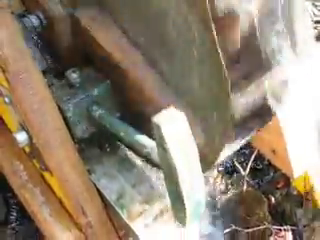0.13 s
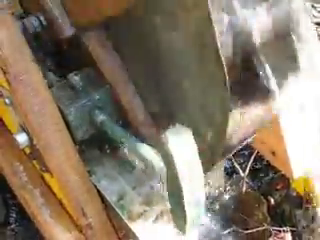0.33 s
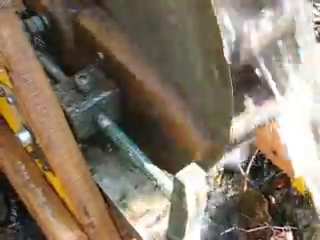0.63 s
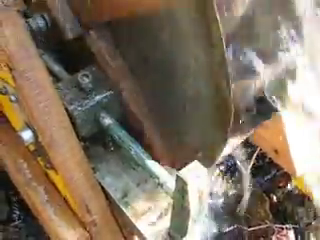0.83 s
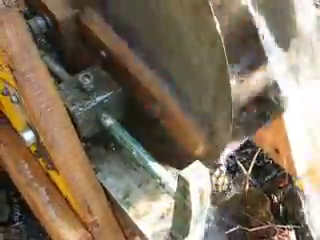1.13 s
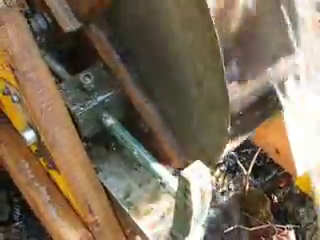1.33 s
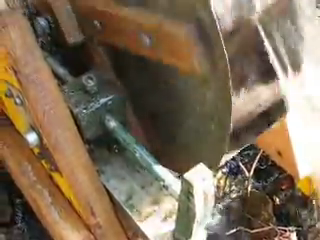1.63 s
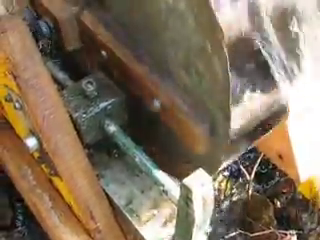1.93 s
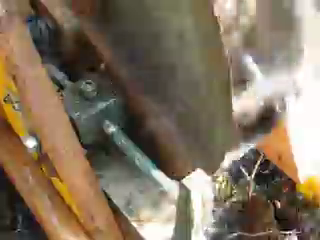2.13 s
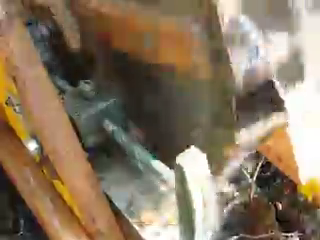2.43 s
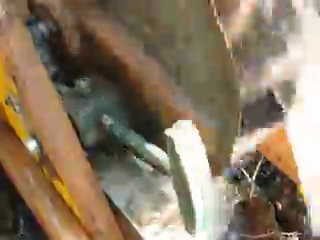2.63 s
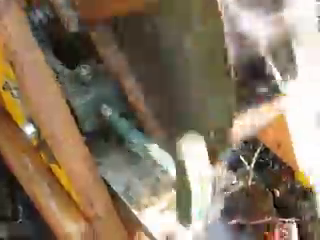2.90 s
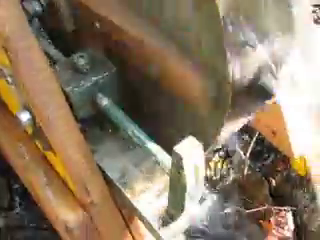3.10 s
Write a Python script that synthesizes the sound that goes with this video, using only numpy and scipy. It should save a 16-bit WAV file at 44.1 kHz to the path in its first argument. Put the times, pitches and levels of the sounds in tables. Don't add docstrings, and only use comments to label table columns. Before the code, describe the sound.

Water rushes and bubbles over a turning mill wheel while a trip hammer bangs sharply.

```python
import sys
import numpy as np
from scipy import signal
from scipy.io import wavfile

SR = 44100
rng = np.random.default_rng(int(sys.argv[2]) if len(sys.argv) > 2 else 0)


def magnitude_from_level(level_db):
    exponent = np.asarray(level_db, float) / 20
    return 10 ** exponent


def int16_out(signal):
    q = np.round(np.clip(np.atleast_2d(signal).T, -1, 1) * 32767)
    wavfile.write(sys.argv[1], SR, q.astype(np.int16))


N = 143766
TIME_S = np.arange(N) / SR
WATER_LAG_S, LAG_SPREAD_S = 4.5e-5, 2e-5
LAG_TOP_HZ = 7600


def rms_one(x):
    return x / np.sqrt(np.mean(x ** 2) + 1e-20)


def at_hz(points, hz):
    p = np.array(points)
    return np.interp(np.log(hz), np.log(p[:, 0] + 1), p[:, 1])


def over_time(points):
    return np.interp(TIME_S, *np.transpose(points))


def drift(rate):
    r = np.exp(-80 * np.pi * rate / SR)
    noise = rng.standard_normal(N // 40 + 2002)
    slow = signal.lfilter([1], [1, -2 * r, r * r], noise)[2000:]
    return np.interp(np.arange(N) / 40, np.arange(len(slow)), rms_one(slow))


def later(x, s):
    return np.interp(np.arange(N) - s * SR, np.arange(N), x)


def filtered(x, order, hz, kind="low"):
    return signal.sosfilt(signal.butter(order, hz, kind, fs=SR, output="sos"), x)


def nearby(x, echo_db):
    t = np.arange(1500) / SR
    echo_t60_s = 0.018
    tail = rng.standard_normal((2, len(t))) * magnitude_from_level(-60 * t / echo_t60_s) * (t > .0006)
    tail = tail / np.sqrt(np.sum(tail ** 2, axis=1, keepdims=True))
    return x + signal.fftconvolve(x, magnitude_from_level(echo_db) * tail, axes=1)[:, :N]


# (frequency [Hz], likeness [-1 to 1])
LIKENESS = [(60, 0.15), (150, 0.65), (300, .8), (1000, .78), (2500, 0.5), (5000, -.1), (9000, 0.35)]
# (frequency [Hz], difference [dB])
LEAN = [(60, 3.5), (170, -1.5), (460, -1), (1260, 0), (3480, -5), (9600, -1.5)]


def banded_noise(spectrum, edges, slow_db, fast_db):
    delayed, direct = np.zeros((2, N)), np.zeros((2, N))
    together = drift(29.0)
    white = rng.standard_normal((2, 2, N))
    for k, (low, high) in enumerate(zip(edges, edges[1:])):
        mid, side = filtered(white[k % 2], 2, [low, high], "band")
        hz = np.sqrt(low * high)
        alike = np.clip(at_hz(LIKENESS, hz), -1, 1)
        lean = at_hz(LEAN, hz) / 2
        gain = magnitude_from_level(at_hz(spectrum, hz) + slow_db * together + fast_db * drift(21.7))
        stereo = np.sqrt(1 + alike) * mid + np.sqrt(1 - alike) * side * [[1], [-1]]
        target = direct if hz > LAG_TOP_HZ else delayed
        target += gain * magnitude_from_level(np.array([[lean], [-lean]])) * stereo
    return rms_one(np.array([later(delayed[0], WATER_LAG_S), delayed[1]]) + direct)


def bubbles(s, db, hz, cycles, rise, lag, pan_db=0):
    out = np.zeros((2, N + SR))
    step = np.arange(int(40 * SR / np.min(hz)))[:1600]
    start = (s * SR).astype(int)[:, None] + step
    left_lag = (lag * (hz < LAG_TOP_HZ))[:, None]
    for ch, sign in enumerate((1, -1)):
        age = np.maximum(step / SR - (left_lag if ch == 0 else 0), 0)
        turns = age * hz[:, None]
        wave = np.sin(2 * np.pi * turns * (1 + rise * turns / cycles))
        wave = wave * magnitude_from_level(-60 * turns / cycles) * np.minimum(turns / 1.87, 1)
        level = magnitude_from_level(db + sign * (at_hz(LEAN, hz) / 2 + pan_db))[:, None]
        out[ch] = np.bincount(start.ravel(), (wave * level).ravel(), N + SR)
    return out[:, :N]


def swarm(rate, low_hz, high_hz, cycles, rise, spread_db, db):
    u = rng.random((3000, 5))[:int(rate * N / SR)]
    size_db = -spread_db * np.log(np.maximum(u[:, 1], .04))
    hz = low_hz * (high_hz / low_hz) ** u[:, 2]
    lag = WATER_LAG_S + LAG_SPREAD_S * 3.4 * (u[:, 3] - .5)
    pan_db = 2 * u[:, 4] - 1
    return magnitude_from_level(db) * rms_one(bubbles(u[:, 0] * N / SR, size_db, hz, cycles, rise, lag, pan_db))


def cluster(rows, cycles, rise, db):
    break_s, break_pitch, break_loss_db = .004, .08, 5
    s, peak, hz = np.repeat(rows, 3, axis=0).T
    u = rng.random((120, 3))[:len(s)]
    order = np.arange(len(s)) % 3
    when = s + break_s * order * u[:, 0]
    level = peak + db - break_loss_db * order * (.5 + u[:, 1])
    pitch = hz / (1 + rise / 3) * (1 + break_pitch * order * (u[:, 2] - .4))
    return bubbles(when, level, pitch, cycles, rise, WATER_LAG_S + 0 * s)


# (time [s], rush level [dB])
FLOW = [(0, -21), (.15, -21.5), (.3, -24), (.6, -20.5), (.9, -18), (1.2, -19), (1.35, -21.5), (1.55, -21),
        (1.799, -22), (1.95, -20.5), (2.098, -21), (2.4, -19.5), (2.5, -22), (2.6, -23), (2.8, -18.5),
        (2.92, -20.5), (3.26, -20.5)]
# (frequency [Hz], level per Hz [dB])
RUSH = [(100, -40), (150, -15.5), (571, -5), (951, 1), (1560, -4), (3380, -1.5), (7400, -5), (12500, -16.5)]
# (rate [1/s], lowest [Hz], highest [Hz], length [cycles], pitch rise [ratio],
# size spread [dB], level [dB])
SWARMS = [
    (156.5, 470, 1604, 19, 0.33, 3.5, -39),
    (364, 1520, 5660, 25.5, 0.076, 2, -30),
    (879, 2760, 8040, 5.8, 0.011, 1, -23.5),
]
# (time [s], peak level [dB], pitch [Hz])
GULPS = [(0.038, -31, 900), (.078, -11, 1040), (.112, -11, 1070), (.181, -15, 940), (.214, -15.5, 666),
         (0.337, -14.5, 600), (.806, -10, 830), (0.863, -3, 980), (.875, -8, 1010), (.989, -15.5, 670),
         (1.209, -8, 700), (1.229, -14, 445), (1.292, -2, 830), (1.387, -5.5, 1010), (1.519, -13.5, 770),
         (1.578, -7, 1190), (1.59, -4, 1100), (1.661, -9.5, 694), (1.768, -16, 940), (1.822, -6.5, 1030),
         (1.998, -7, 830), (2.084, -5, 1016), (2.196, -7, 950), (2.747, -9.5, 614), (2.806, -5, 690),
         (2.856, -14, 356), (2.877, -9, 1010), (2.91, -8.5, 775)]
# (time [s], peak level [dB], pitch [Hz])
PLINKS = [(.0398, -5, 3420), (0.0937, -5, 4330), (.2124, -4, 4900), (.215, -18, 1670), (.218, -8.5, 2700),
          (0.2354, -2, 3500), (0.3643, -0.5, 2680), (.8829, -7, 3060), (1.0236, -13, 1570),
          (.9328, -5, 3180), (.9862, -1, 6560), (1.1982, -4, 2570), (1.2351, -1.5, 3930),
          (1.267, -11, 4000), (1.3906, -3.5, 1450), (1.397, -8, 1590), (1.4502, -2, 4105),
          (1.505, -9, 3080), (1.5584, -10, 2100), (1.5928, -3, 1476), (1.8053, -7, 2300), (1.852, -5, 2120),
          (2.0108, -17, 3130), (2.0343, -11, 2410), (2.2797, -9, 3260), (2.4159, -14, 3120),
          (2.4364, -7, 2540), (2.5351, -17, 3580), (2.644, -11.5, 3300), (2.708, -7, 3380),
          (2.738, -8.5, 3360), (2.7731, -13, 2300), (2.8496, -3.5, 2930), (2.866, -16, 3350),
          (3.1652, -8.5, 2730)]
# (time [s], peak level [dB], pitch [Hz])
SPITS = [(0.3262, -7, 5270), (1.2226, -5, 5040), (1.45, -1, 5800), (1.8774, -2, 6600), (2.035, -7, 4800),
         (2.1635, -5, 4900), (2.3316, -9, 4600), (2.368, -20, 4180), (2.6279, -5, 5560), (2.9244, -3, 5850)]


def water():
    flow = over_time(FLOW)
    edges = 140 * 2 ** np.arange(0, 6.6, .4)
    rush = magnitude_from_level(flow) * banded_noise(RUSH, edges, slow_db=0.44, fast_db=3.0)
    drops = magnitude_from_level(flow - flow.mean()) * sum(swarm(*row) for row in SWARMS)
    drops = drops + cluster(GULPS, cycles=22.5, rise=.3, db=-6)
    drops = drops + cluster(PLINKS, cycles=26.2, rise=.2, db=0)
    drops = drops + cluster(SPITS, cycles=27, rise=0.045, db=0)
    return rush + nearby(drops, echo_db=-8)


# (time [s], level [dB])
GUSTS = [(0, -46), (.35, -50.5), (.41, -36), (.55, -46), (.7, -49), (.85, -40.5), (1.2, -39.5),
         (1.65, -50.5), (1.8, -32), (1.95, -44), (2.1, -48.5), (2.3, -42), (2.55, -55), (2.9, -40.5),
         (3.26, -39.5)]
# (frequency [Hz], level per Hz [dB])
WIND = [(25, -2.5), (60, 5.5), (120, -8.5), (300, -20)]


def wind():
    edges = 20 * 2 ** np.arange(0, 4.1, .5)
    return magnitude_from_level(over_time(GUSTS)) * banded_noise(WIND, edges, slow_db=4.5, fast_db=2.0)


def struck(s, db, modes):
    out = np.zeros(N)
    for k, (hz, level_db, t60) in enumerate(modes):
        clicks = np.full(N, 1e-18)
        clicks[(np.array(s) * SR).astype(int)] = magnitude_from_level(np.array(db) + level_db) * (-1) ** k
        r, w = magnitude_from_level(-60 / (t60 * SR)), 2 * np.pi * hz / SR
        out += signal.lfilter([0, np.sin(w)], [1, -2 * r * np.cos(w), r * r], clicks)
    return out


def wet_ring(s, db, modes):
    wet_db, wet_rate = 1.0, 14
    out = 0
    for mode in modes:
        out = out + struck(s, db, [mode]) * magnitude_from_level(wet_db * drift(wet_rate) - wet_db / 3)
    return out


# (time [s], level [dB])
TICKS = [
    (0.0, -29),
    (.512, -21),
    (1.297, -24),
    (1.93, -31),
    (2.075, -22),
    (2.858, -21),
]
# (frequency [Hz], level [dB], time to die by 60 dB [s])
BAR = [(1802, -3, 1.4), (6110, -3, .4), (7386, -8, .4), (10720, -10, .4), (11400, -6, .3)]
# (time [s], thud level [dB], then levels of the three ringing parts [dB])
KNOCKS = [
    (.127, -11, -23, -31, -29),
    (.901, -9, -19, -38, -31),
    (1.688, -11, -29, -24, -24),
    (2.465, -13, -26, -15, -31),
    (3.2415, -14, -24, -30, -30),
]
# (frequency [Hz], level [dB], time
# to die by 60 dB [s])
THUD = [(560, 0, .035), (330, -13, .025), (2930, -4, .012), (9200, -10, .2), (9424, -10, .2),
        (10716, -15, .2)]
# (frequency [Hz], level [dB], time to die by 60 dB [s])
PARTS = [
    [(4126, 0, .7), (4091, -8, .5), (4626, -4, 1.1), (1259, -11, .8)],
    [(3537, 0, .33), (3510, -18, .8)],
    [(6668, -1, .4), (2929, -5, .6), (3510, -3, .5)],
]
# (time [s], level [dB])
SLAPS = [
    (1.762, -21),
    (1.881, -16),
    (1.935, -16.5),
    (2.074, -27),
    (2.228, -16),
    (2.563, -23),
    (2.681, -17.5),
]


def tappets():
    s, thud, *parts_db = np.transpose(KNOCKS)
    thuds = struck(s, thud, THUD) + struck(*np.transpose(SLAPS), THUD[:2])
    thuds = filtered(thuds, 2, 250.0, "high")
    ring = wet_ring(*np.transpose(TICKS), BAR)
    for db, modes in zip(parts_db, PARTS):
        ring = ring + wet_ring(s, db, modes)
    ring = ring * magnitude_from_level(1.1)
    return nearby(np.array([thuds, thuds]), echo_db=-12.5) + np.array([ring, later(ring, 1e-5)])


# (time [s], level [dB], crack level [dB])
BLOWS = [
    (.3945, -1.5, 6),
    (2.9357, 0.5, 4),
]
# (time [s], level [dB], crack level [dB])
BOUNCES = [
    (.4306, -4, -20),
    (.443, -14, -28),
    (2.9658, -2, -18),
    (2.984, -12, -28),
]
# (frequency [Hz], level [dB], time to die by 60 dB [s])
ANVIL = [(580, -8, .03), (888, -20, .06), (1308, -19, .05), (1884, -17, .1), (2708, -13, .025),
         (3822, -11, .11), (3960, -11, .07), (4060, 3, .028), (4748, -12, .015), (6621, -16, .025),
         (7600, -3, .012), (8829, -7, .035)]
# (time [s], level [dB], crack level [dB])
GLANCE = [
    (1.0413, 0.5, 9),
    (1.0432, -15, -2),
    (1.047, -9, -14),
]
# (frequency [Hz], level [dB], time to die by 60 dB [s])
HELVE = [(400, -13, .03), (1100, -12, .05), (2300, -11, .02), (2778, -14, .025), (4400, -1, .026),
         (4990, -13, .04), (5905, -3, .04), (7267, -6, .022), (7757, -2, .028), (10660, -10, .008)]


def hammer():
    crack_t60_s, crack_hz, bounce_hz = 0.0086, 11200, 4600
    out = np.zeros((2, N))
    grit = rng.standard_normal(N) + .5 * rng.standard_normal((2, N))
    grit = filtered(grit, 2, 400.0, "high")
    hits = ((BLOWS, ANVIL, crack_hz), (BOUNCES, ANVIL, bounce_hz), (GLANCE, HELVE, crack_hz))
    for rows, modes, top_hz in hits:
        s, db, crack_db = np.transpose(rows)
        hit = struck(s, db, modes) * magnitude_from_level(np.array([[-.7], [.7]]))
        for at, c in zip(s, crack_db):
            fade_db = -60 * np.clip(TIME_S - at, 0, 1) / crack_t60_s
            hit = hit + grit * (TIME_S >= at) * magnitude_from_level(c + fade_db)
        out += filtered(hit, 3, top_hz)
    return nearby(filtered(out, 2, 270.0, "high"), echo_db=-13)


def scene():
    return water() + wind() + tappets() + hammer()


def top_cut(x):
    return signal.sosfilt(signal.butter(12, 11700, fs=SR, output="sos"), x)


# (time [s], depth [dB], recovery [s])
DUCKS = [
    (0.396, 9, 0.21),
    (0.427, 7, 1),
    (1.042, 12.5, 0.17),
    (2.937, 14, 0.27),
    (2.966, 4, 0.21),
]


def record(dry):
    attack_s, shape, mic_hz = 0.007, 2.76, 8280
    gain_db = 0
    for s, depth_db, back_s in DUCKS:
        age = np.maximum(TIME_S - s, 0)
        ducking = 1 - np.exp(-age / attack_s)
        recovery = np.exp(-(age / back_s) ** shape)
        gain_db = gain_db - depth_db * ducking * recovery
    mix = np.clip(filtered(dry, 6, mic_hz) * magnitude_from_level(gain_db), -1, 1)
    return top_cut(mix)


dry = scene()
out = record(dry)
int16_out(out)
```